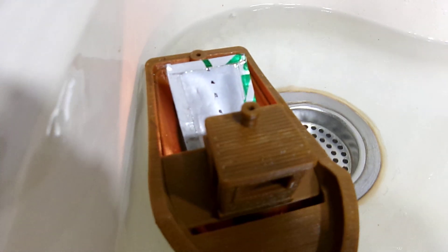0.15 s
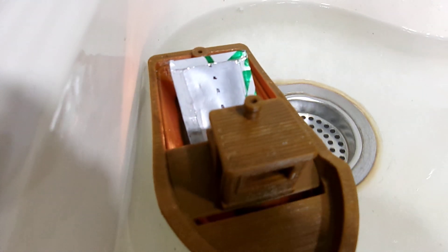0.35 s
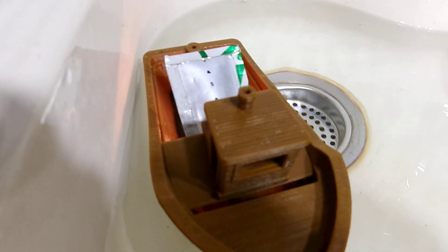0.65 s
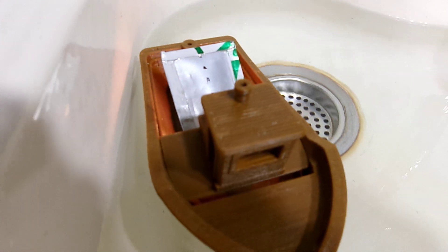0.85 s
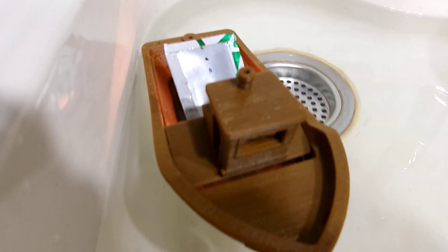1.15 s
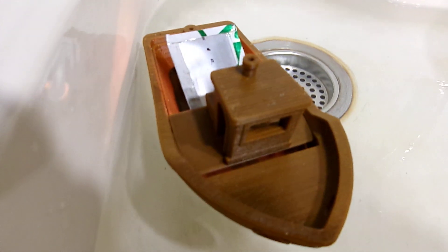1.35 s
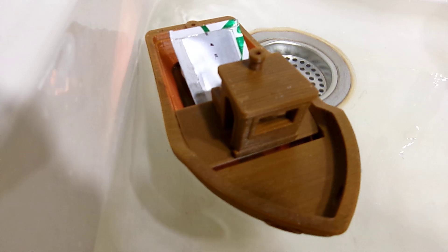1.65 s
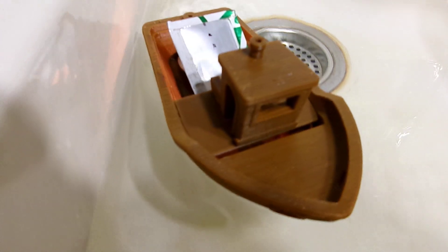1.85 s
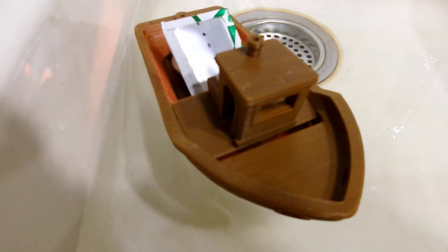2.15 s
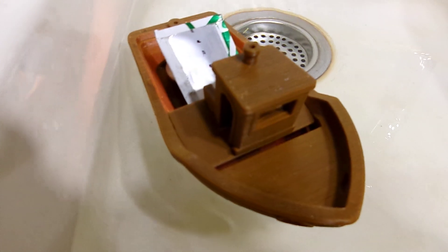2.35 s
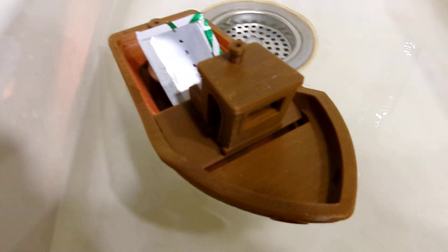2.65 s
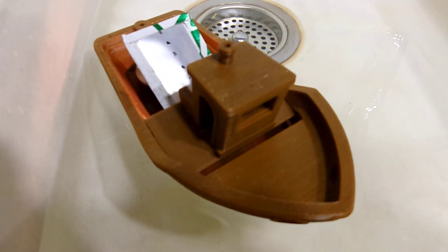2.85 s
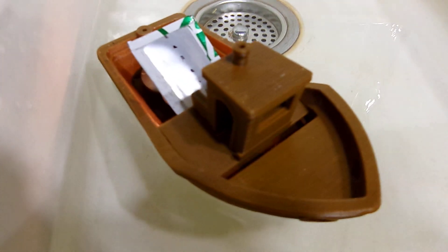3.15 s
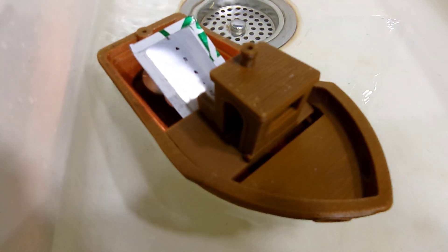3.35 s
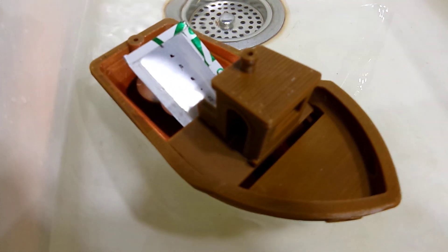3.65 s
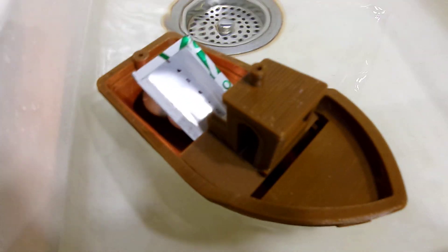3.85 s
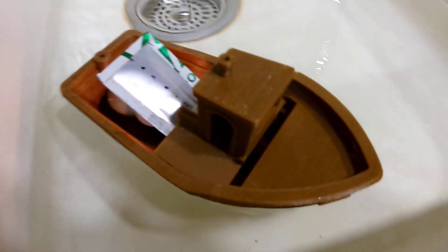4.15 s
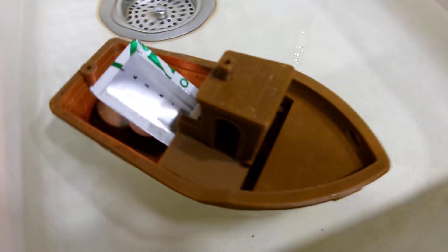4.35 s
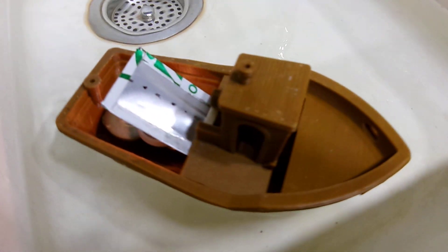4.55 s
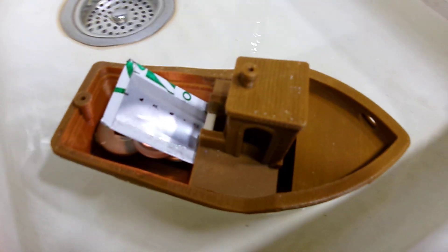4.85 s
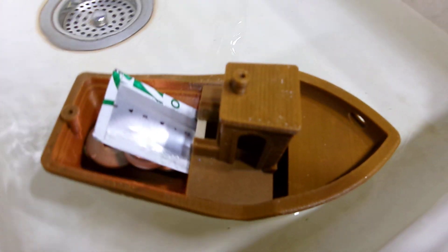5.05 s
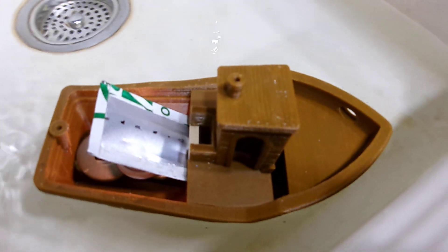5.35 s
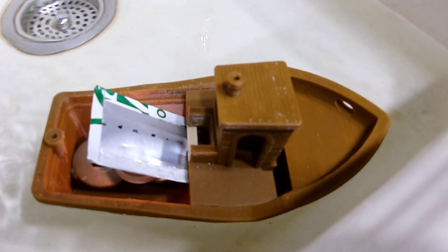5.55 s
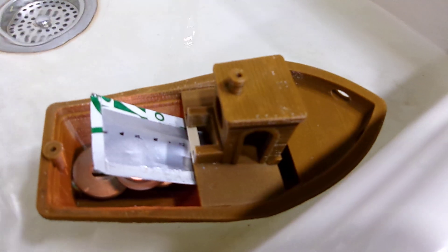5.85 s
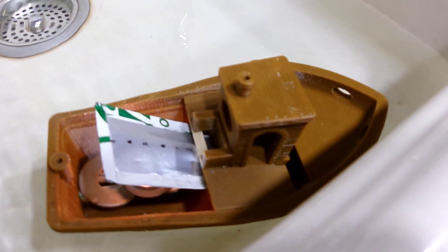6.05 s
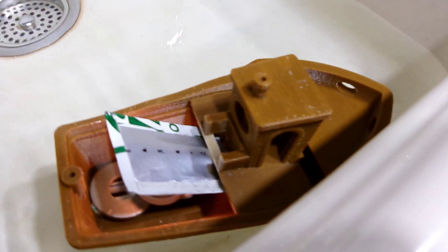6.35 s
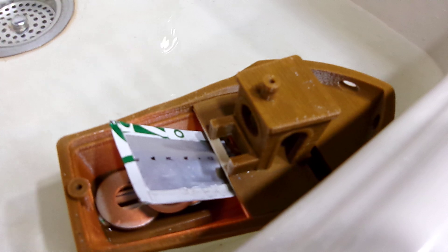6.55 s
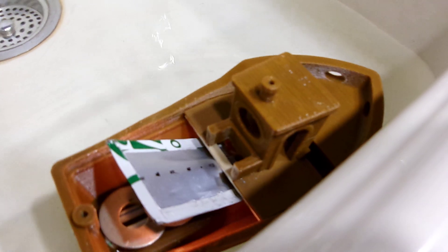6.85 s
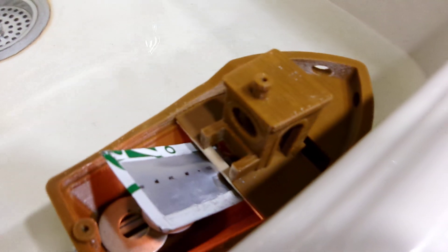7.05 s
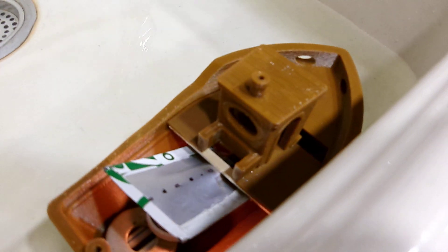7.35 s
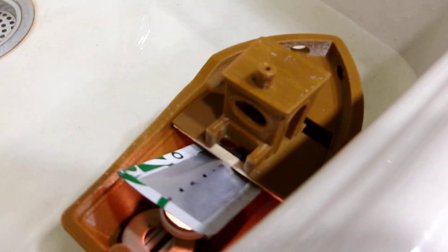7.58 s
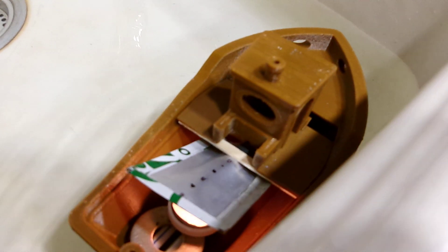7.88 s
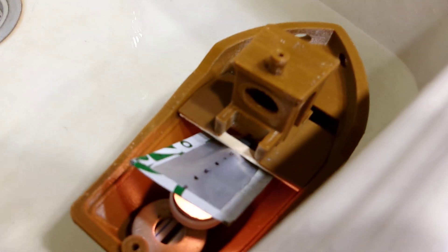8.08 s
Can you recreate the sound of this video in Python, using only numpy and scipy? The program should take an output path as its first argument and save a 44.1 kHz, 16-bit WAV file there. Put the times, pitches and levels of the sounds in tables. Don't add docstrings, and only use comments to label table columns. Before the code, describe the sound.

A candle-heated toy steam boat putters in a sink, close to a phone, for about eight seconds. From the start its thin metal boiler pops rapidly and evenly, roughly nine beats a second, each beat a hollow snap outward and a lighter tinny snap back, ringing the small hull with a short basin echo. The popping grows to a first peak around 1.5 seconds, drops near 1.9, then builds again to a harder, crackling stretch around 3.0-3.5. A sharp bright handling click lands at 3.3, a faint tick at 4.15 with a brief finger rub. A third surge peaks near 5.1 with creasing metal and steam spits, then falls to its weakest around 5.8. It gradually recovers, brighter and more rattly from 7.4, with a crisp spit near 8.05. Fine spray hisses softly; quiet room air and faint hum lie beneath.

```python
import sys
import numpy as np
from scipy import signal
from scipy.fft import rfft, irfft
from scipy.io import wavfile

SR = 44100
rng = np.random.default_rng(int(sys.argv[2]) if len(sys.argv) > 2 else 0)


def log_audio(samples):
    frames = np.atleast_2d(samples).T
    limited = np.clip(frames, -1, 1)
    pcm = np.round(limited * 32767).astype(np.int16)
    wavfile.write(sys.argv[1], SR, pcm)


def level_to_linear(level):
    exponent = np.asarray(level, float) / 20
    return 10 ** exponent


N = 362502
RING = np.arange(4096) / SR

# f/Hz, level per Hz/dB
ROOM_COLOUR = [(12, -90), (20, 3), (37, -12.5), (108, -17), (205, -21.5), (279, -17.5), (437, -24),
               (1100, -25), (1200, -19.5), (1380, -33), (2560, -37), (5600, -41.5), (6090, -40.5),
               (14900, -42.5), (16300, -47)]
# f/Hz, rms level/dB
HUM = [(152, -79), (263, -83)]
ROOM_DB = -61

# foil snaps out t/s, level/dB, snaps back after/s
SURGE_1 = [(.0189, -38.5, .0486), (.136, -40, .0446), (.249, -40.5, .048), (.3691, -40.5, .0459),
           (.4871, -40, .0439), (.599, -38.5, .0445), (.7133, -38, .0467), (.8281, -38.5, .0441),
           (.939, -37.5, .0461), (1.0509, -37, .0441), (1.1601, -36, .0466), (1.2717, -35, .0466),
           (1.3821, -34, .0455), (1.4886, -33, .045), (1.5929, -33, .0462), (1.7016, -37, .0496),
           (1.8133, -40.5, .0507)]
SURGE_2 = [(1.9295, -43, .0505), (2.0495, -42, .0445), (2.1654, -39.5, .045), (2.2847, -39, .0438),
           (2.4059, -37, .0396), (2.5168, -35.5, .0429), (2.6288, -35, .0452), (2.7416, -35, .0439),
           (2.8506, -35, .0457), (2.9605, -33.5, .0465), (3.0709, -33.5, .0473), (3.1809, -33, .044),
           (3.2913, -33, .0435), (3.4, -33.5, .041), (3.5111, -35.5, .0464), (3.622, -36.5, .0483),
           (3.7367, -38.5, .0474), (3.8502, -39.5, .0498)]
SURGE_3 = [(3.9678, -40.5, .049), (4.0894, -41, .0436), (4.2045, -40, .0439), (4.3183, -39.5, .0422),
           (4.43, -37, .0437), (4.5422, -37, .0465), (4.6551, -36, .0463), (4.7663, -35.5, .0455),
           (4.877, -34.5, .0435), (4.9857, -33.5, .0459), (5.0949, -32.3, .044), (5.2013, -33, .0453),
           (5.3083, -35, .0455), (5.4172, -37.1, .045), (5.5234, -39.5, .049), (5.636, -44, .0509),
           (5.752, -47.5, .0537)]
SURGE_4 = [(5.8776, -47, .0514), (6.0037, -46.5, .048), (6.1264, -44, .0442), (6.2513, -42.5, .0389),
           (6.369, -42.5, .0433), (6.4912, -42, .0343), (6.6028, -41, .0359), (6.7157, -41, .0331),
           (6.8227, -39.5, .0398), (6.9341, -39, .0374), (7.0436, -38.5, .0425), (7.1533, -38.5, .0465),
           (7.2657, -37, .0416), (7.375, -37, .046), (7.4827, -37, .0458), (7.5921, -37.5, .0465),
           (7.7022, -37.5, .0464), (7.8096, -38, .0448), (7.9169, -38, .0438), (8.0223, -39, .0496),
           (8.1251, -44.5, .0495)]
STROKES = SURGE_1 + SURGE_2 + SURGE_3 + SURGE_4
# t/s, level/dB, foil over cabin ring/dB, treble/dB
CREASES = [(0.0421, -53.5, 1.5, -1), (1.1918, -39.5, -12, -12.5), (1.2658, -47, -11, -7),
           (1.4182, -40, -13, -0.5), (1.523, -39, -6, -10), (1.623, -41, -11, -26), (1.631, -35.5, -8, -3),
           (1.736, -50, -17, -2), (2.992, -36, -14, -8), (3.067, -48, 5, -10), (3.2204, -33, 12, -27),
           (3.332, -38, 11, -12), (3.4339, -33.5, -5, -36), (3.5513, -54, -2, 1), (4.806, -43.5, -18, -21),
           (5.1275, -42.5, -19, -22), (5.2375, -36.5, -8, -10), (5.3415, -39, -20, -12),
           (5.449, -41.5, -6, -16), (5.4542, -38, -15, -5.5), (5.547, -46, -7, -5.5),
           (5.5609, -43, -18, -8), (6.5998, -64.5, -5, 14.5), (7.4014, -37.5, -7.5, -12),
           (7.6312, -47, -13, -20), (7.7263, -36, -10, -11.5), (7.738, -42.5, -16, -2),
           (7.8397, -40.5, -10, -15), (7.9471, -39.5, -4, -10.5), (8.0541, -34, 4, -6)]

# f/Hz, level/dB, time to fall 60 dB/s
HULL = [(695, 4.5, 0.03), (391, -15.5, 0.082), (549.4, -7.5, 0.029)]
DECK = [(810, 1, 0.028)]
CABIN = [(1278, 11, 0.024), (1140, -5.5, 0.039), (1400, -41, 0.034)]
FOIL_LOW = [(1648.5, 20, 0.021), (1440, -12, 0.075)]
FOIL_EDGE = [(1750, 37, 0.038), (1910, -1, 0.038), (1900, -57, 0.0067)]
FOIL_CREASED = [(2035, 2.5, 0.042), (1694, -5.5, 0.027), (2200, -10, 0.0073)]
# f/Hz, level/dB, time to fall 60 dB/s
TREBLE = [(2430, 3.5, 0.013), (2640, 4, 0.0092), (3200, -2, 0.016), (3550, 0.5, 0.011), (3870, -2, 0.0069),
          (4396, -1.5, 0.011), (5496, -1.5, 0.0072)]
# f/Hz, level/dB, time to fall 60 dB/s
KNOCK = [(1521, 0, 0.014)]
SWELL_S, CABIN_SWELL_S = 0.00024, 0.00076

# t/s, hull f/Hz, deck f/Hz,
# cabin f/Hz, cancelled f/Hz
PITCH = [(0, 723, 780, 1306, 1000), (.9, 686, 863, 1360, 1074), (1.4, 780, 894, 1320, 1040),
         (1.62, 776, 906, 1320, 996), (1.85, 700, 820, 1320, 1020), (2.4, 716, 878, 1316, 1010),
         (3.5, 706, 866, 1333, 1000), (4.2, 680, 816, 1284, 1000), (4.6, 675, 904, 1290, 1040),
         (5.5, 680, 850, 1305, 840), (5.9, 670, 876, 1303, 828), (8.2, 693, 874, 1360, 855)]
# t/s, foil edge f/Hz, brightest rattle f/Hz
EDGE_HZ = [(0, 1850, 3430), (.8, 1790, 3580), (1.1, 1720, 3520), (2, 1750, 3550), (2.6, 1900, 3370),
           (3.7, 1830, 3380), (4.5, 1760, 3510), (5.5, 1745, 3740), (5.9, 1774, 3060), (8.2, 1800, 2870)]
# t/s, deck/dB, foil/dB, foil edge/dB, suction level under the pop/dB
TURN = [(0, -28, -4, -10, -1.5), (.35, -8.5, -2, -2.5, -2), (1, -4, -7, -3.5, -1.5),
        (1.5, -3, -10.5, -7, -2.5), (1.95, -8, -6, -29, -1), (2.3, 0.5, -2, -38, -1),
        (2.9, -4, -3, -22, -2), (3.4, -7, -5, -10, -2.5), (3.9, -10.5, -5.5, -13, -3),
        (4.4, -12.5, -8.5, -11, -4.5), (5, -20, -14, -14.5, -6), (5.9, -27, -13.5, -19, -3.5),
        (6.3, -2, -7, -2, -3.5), (6.9, -1, -3.5, -3.5, -3.5), (7.5, -0.5, -4.5, -1.5, -3.5),
        (7.9, 0.5, -1.5, 1.5, 1), (8.2, 0, -7.5, 3, -7)]

# hull/dB, deck/dB, foil/dB, edge/dB, treble/dB, hiss/dB
OUT_DB = (-4, 0.8, -0.8, -5.2, -19, -36)
# hull/dB, deck/dB, foil/dB, edge/dB, treble/dB, hiss/dB
BACK_DB = (-12, 6.5, 7, -3.5, -9.5, -32)
BACK_SEES = (0.5, 1.9, 0.36)
HULL_PER_DB, TREBLE_PER_DB, TREBLE_PER_EDGE, USUAL_DB = -0.72, 0.52, 0.25, -35.5
BACK_HULL_PER_DECK = -0.053

# t/s, peak level/dB, time to fall 60 dB/s
SPITS = [(1.095, -45, 0.025), (1.5346, -40, 0.021), (1.7299, -55, 0.022), (3.1198, -40.5, 0.017),
         (3.314, -51, 0.033), (3.531, -54, 0.017), (3.5522, -39.5, 0.016), (3.6715, -54, 0.022),
         (4.338, -56, 0.036), (5.248, -40, 0.023), (5.335, -49.5, 0.03), (5.5532, -49, 0.073),
         (6.9564, -51.5, 0.034), (7.201, -41, 0.018), (7.5025, -51.5, 0.052), (7.725, -46, 0.034),
         (7.8491, -50.5, 0.013), (7.9602, -44.5, 0.028), (8.0583, -35, 0.014)]

# t/s, peak level/dB, centre f/Hz, thump level/dB
TICKS = [
    (3.3018, -23, 8600, -35),
    (4.1494, -41, 3140, -42),
]
# f/Hz, level/dB, time to fall 60 dB/s
CASE = [(8960, 5.5, 0.0033), (11900, 5.5, 0.0022), (3540, 1, 0.0051), (4900, -13.5, 0.011)]


def unit(x):
    return x * np.sqrt(SR / 100 / np.sum(x ** 2))


def band(x, lo_hz, hi_hz):
    return signal.sosfilt(signal.butter(2, [lo_hz, hi_hz], "band", fs=SR, output="sos"), x)


def notch(x, hz, width_hz):
    return signal.lfilter(*signal.iirnotch(hz, hz / width_hz, SR), x)


def add(out, s, sound):
    k = int(s * SR)
    out[k:k + len(sound)] += sound[:N - k]


def at_time(table, s):
    times, *columns = np.transpose(table)
    return np.array([np.interp(s, times, c) for c in columns])


def fade(t, t60):
    return np.exp(-np.log(1000) * t / t60)


def ring(modes, scatter, hz=None, swell_s=SWELL_S):
    f, db, t60 = np.transpose(modes)[:, :, None]
    pitch_chance, level_chance = rng.standard_normal((2, len(modes), 1))
    f = f * (hz or f[0]) / f[0]
    f = f * (1 + 0.0059 * scatter * pitch_chance)
    shape = (1 - np.exp(-RING / swell_s)) ** 2 * fade(RING, t60)
    tones = level_to_linear(db + scatter * level_chance) * shape * np.sin(2 * np.pi * f * RING)
    return unit(np.sum(tones, axis=0))


def burst(lo_hz, hi_hz, t60, rise_s):
    shape = (1 - np.exp(-RING / rise_s)) * fade(RING, t60)
    return band(rng.standard_normal(len(RING)), lo_hz, hi_hz) * shape


def room():
    hz = np.fft.rfftfreq(N, 1 / SR) + 1
    corner_hz, corner_db = np.transpose(ROOM_COLOUR)
    colour = level_to_linear(np.interp(np.log(hz), np.log(corner_hz), corner_db))
    air = irfft(rfft(rng.standard_normal(N)) * colour, N)
    t = np.arange(N) / SR
    hum = sum(level_to_linear(db) * np.sqrt(2) * np.sin(2 * np.pi * f * t) for f, db in HUM)
    return level_to_linear(ROOM_DB) * air / np.std(air) + hum


def boat_body(s, parts_db, scatter, knock_db, creased):
    hull_hz, deck_hz, cabin_hz, cancelled_hz = at_time(PITCH, s)
    hull, deck, foil, edge = level_to_linear(parts_db)
    body = hull * ring(HULL, scatter, hull_hz) + deck * ring(DECK, scatter, deck_hz)
    body = body + ring(CABIN, scatter, cabin_hz, CABIN_SWELL_S)
    body = body + foil * ring(FOIL_LOW, scatter)
    if creased:
        body = body + edge * ring(FOIL_CREASED, scatter)
    else:
        body = body + edge * ring(FOIL_EDGE, scatter, at_time(EDGE_HZ, s)[0])
    body = unit(band(body, 367, 3480)) + level_to_linear(knock_db) * ring(KNOCK, scatter)
    body = unit(body)
    depth = np.clip(1.58 + at_time(TURN, s)[1] / 11.0, 0, 1)
    return unit(body + depth * (notch(body, cancelled_hz, width_hz=204) - body))


def foil_rattle(s, crumple_s):
    t = RING[:1024]
    kinks = rng.standard_normal(1024) ** 3 * np.exp(-t / crumple_s)
    kinks[0] += 16
    rattle = unit(np.convolve(ring(TREBLE, scatter=0.82, swell_s=0.00015)[:1024], kinks))
    bright_hz = at_time(EDGE_HZ, s)[1]
    rattle = unit(rattle + level_to_linear(-1) * band(rattle, 0.91 * bright_hz, 1.143 * bright_hz))
    return np.pad(rattle, (0, len(RING) - len(rattle)))


def snap(s, db, parts_db, treble_db, hiss_db, scatter, crumple_s, knock_db, creased=False):
    body = boat_body(s, parts_db, scatter, knock_db, creased)
    rattle = foil_rattle(s, crumple_s)
    hiss = unit(burst(7660, 10250, 0.061, rise_s=0.00033))
    return level_to_linear(db) * (body + level_to_linear(treble_db) * rattle + level_to_linear(hiss_db) * hiss)


def snap_change(hard, seen, share):
    return np.array([HULL_PER_DB * hard, *(np.array(share) * seen), TREBLE_PER_EDGE * seen[2], 0])


def boiler():
    out = np.zeros(N)
    for s, db, dwell_s in STROKES:
        *seen, suction_db = at_time(TURN, s)
        seen = np.array(seen)
        hard = db - USUAL_DB

        chance = 2.5 * rng.standard_normal(6) * [0, 0, 0, 1, 1, 1]
        *parts_db, treble_db, hiss_db = OUT_DB + snap_change(hard, seen, 0.85) + chance
        pop = snap(s, db, parts_db, treble_db, hiss_db, scatter=0.29, crumple_s=0.01, knock_db=-13)
        add(out, s, -pop)

        chance = 1.6 * rng.standard_normal(6) * [0.74, 0, 0.17, 2.2, 1.5, 2.2]
        *parts_db, treble_db, hiss_db = BACK_DB + snap_change(hard, seen, BACK_SEES) + chance
        parts_db[0] += BACK_HULL_PER_DECK * seen[0]
        treble_db += TREBLE_PER_DB * hard
        back = snap(s, db + suction_db, parts_db, treble_db, hiss_db,
                    scatter=0.98, crumple_s=0.0044, knock_db=-7.0 + 0.13 * seen[2])
        add(out, s + dwell_s + SWELL_S, back)

    for s, db, foil_db, treble_db in CREASES:
        deck_db = 1.5 + 1.5 * at_time(TURN, s)[0]
        parts_db = np.array([deck_db - 8.5, deck_db, foil_db + 6.5, foil_db + 10.7])
        crease = snap(s, db, parts_db, treble_db, hiss_db=-33,
                      scatter=2.7, crumple_s=0.0025, knock_db=-18, creased=True)
        add(out, s, crease)
    return out


def steam():
    out = np.zeros(N)
    for s, db, t60 in SPITS:
        fizz = burst(6750, 10200, t60, rise_s=0.00014)
        add(out, s, level_to_linear(db) * fizz / np.max(np.abs(fizz)))
    for s, db, _ in STROKES:
        late, size = rng.random(2)
        simmer_db = -69.5 + 0.34 * (db + 46) - 1.7 * size
        simmer = unit(burst(5000, 10600, 0.058, rise_s=0.0019))
        add(out, s + 0.003 + 0.033 * late, level_to_linear(simmer_db) * simmer)
    return out


def spray():
    out = np.zeros(N)
    for s, db, dwell_s in STROKES:
        spray_db = -65 + 1.05 * (db - USUAL_DB)
        droplets = unit(burst(1900, 3700, 0.13, rise_s=0.0039))
        add(out, s + dwell_s - 0.008, level_to_linear(spray_db) * droplets)
    return out


def basin(x):
    t = np.arange(SR // 2) / SR
    near, far = rng.standard_normal((2, len(t))) * (1 - np.exp(-t / 0.0025))
    near = near * fade(t, 0.071)
    far = band(far, 170, 6600) * fade(t, 0.43)
    echo = level_to_linear(-13.5) * near / np.linalg.norm(near) + level_to_linear(-23.5) * far / np.linalg.norm(far)
    return signal.fftconvolve(x, echo)[:N]


def hand():
    out = np.zeros(N)
    for s, db, hz, thump_db in TICKS:
        crack = ring(CASE, 0, hz, swell_s=0.0001)
        thump = np.e * RING / 0.00071 * np.exp(-RING / 0.00053)
        add(out, s, level_to_linear(db) * crack / np.max(np.abs(crack)) + level_to_linear(thump_db) * thump)
    return out


def slide():
    start_s, long_s, level_db, bright_s = 4.075, 0.17, -63, 0.065
    t = np.clip(np.arange(N) / SR - start_s, 0, None)
    shape = np.sin(np.pi * np.clip(t / long_s, 0, 1) ** 1.3)
    shape = shape + 0.5 * (t > 0) * (t < 0.04)
    bright = (1 - np.exp(-t / 0.004)) * np.exp(-(t / bright_s) ** 2)
    low, high = rng.standard_normal((2, N))
    return level_to_linear(level_db) * (7.1 * shape * band(low, 1800, 3180) + 1.85 * bright * band(high, 3500, 9500))


def scene():
    boat = boiler() + steam() + spray()
    in_sink = notch(boat + basin(boat), 450, width_hz=33)
    return (in_sink + hand() + slide() + room())[None, :]


def roll_off(x):
    return signal.sosfilt(signal.butter(12, 16410, fs=SR, output="sos"), x)


def record(dry):
    top_cut = signal.ellip(10, 0.2, 60, 15800, fs=SR, output="sos")
    mix = signal.sosfilt(top_cut, dry)
    return roll_off(mix)


dry = scene()
out = record(dry)
log_audio(out)
```